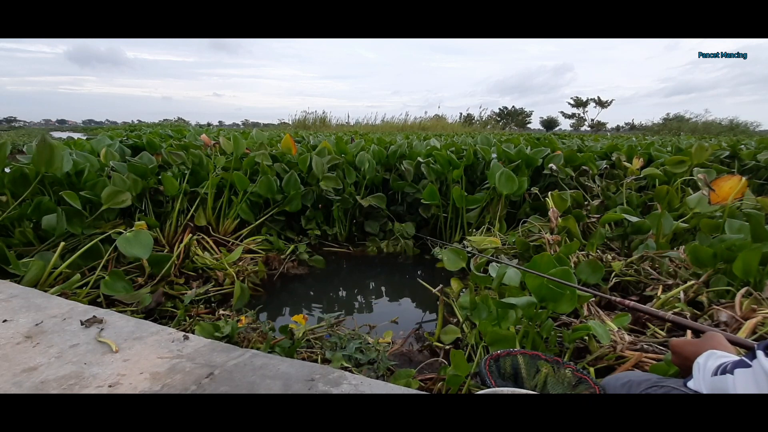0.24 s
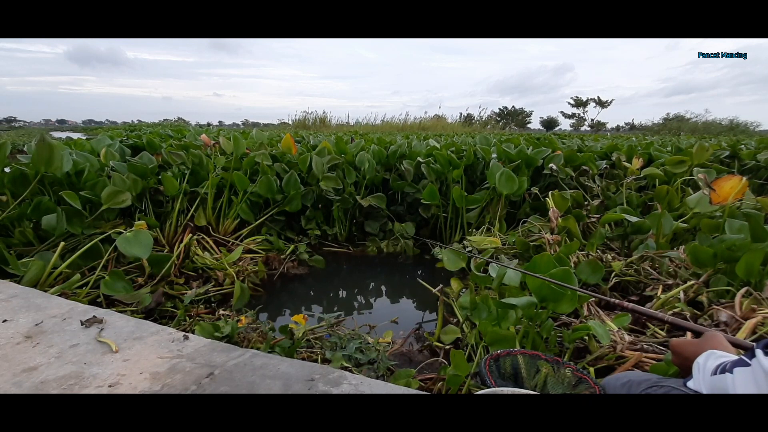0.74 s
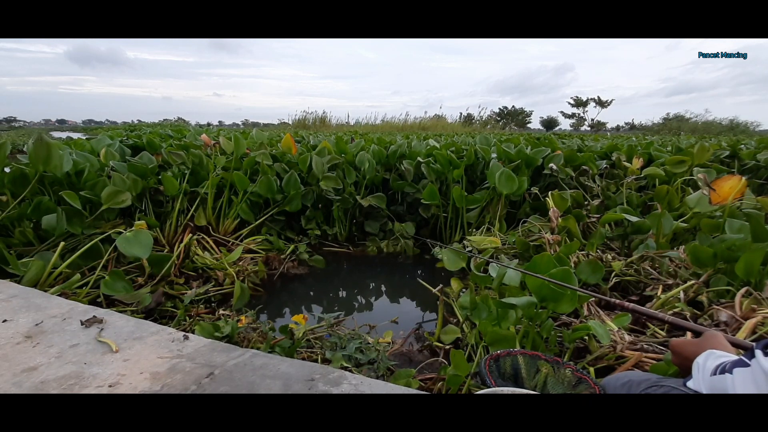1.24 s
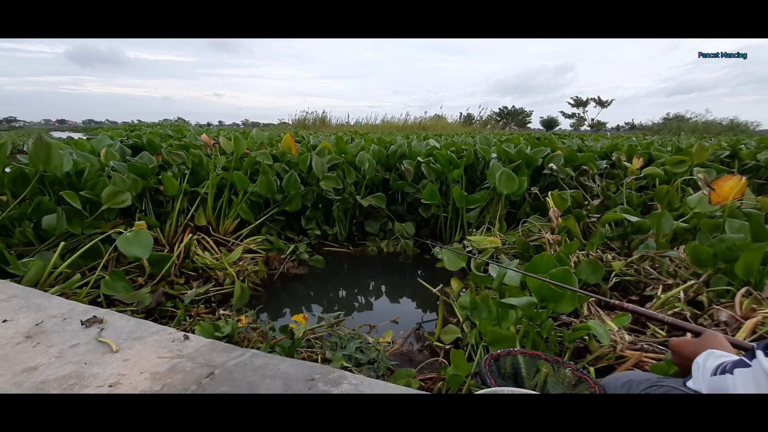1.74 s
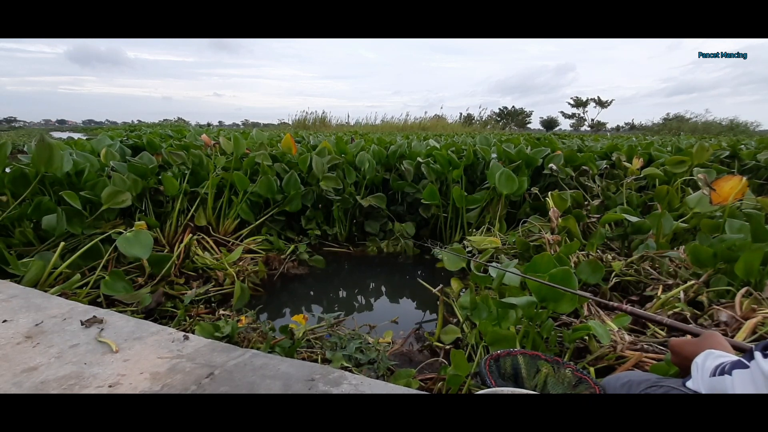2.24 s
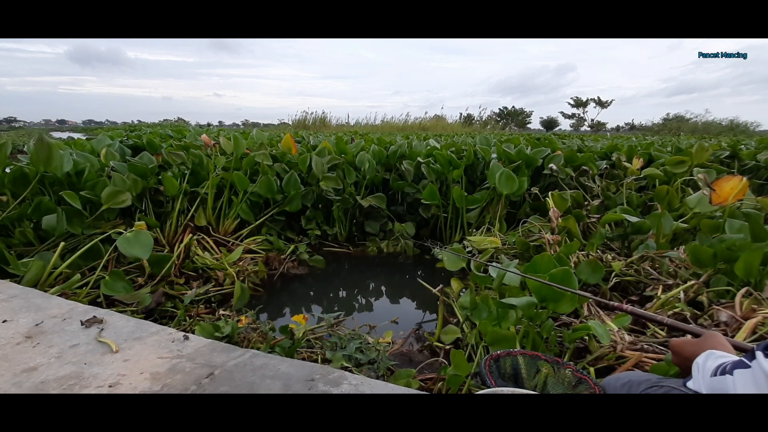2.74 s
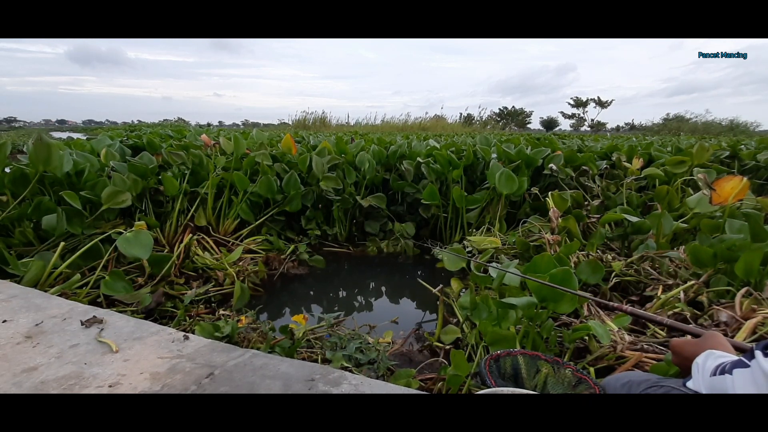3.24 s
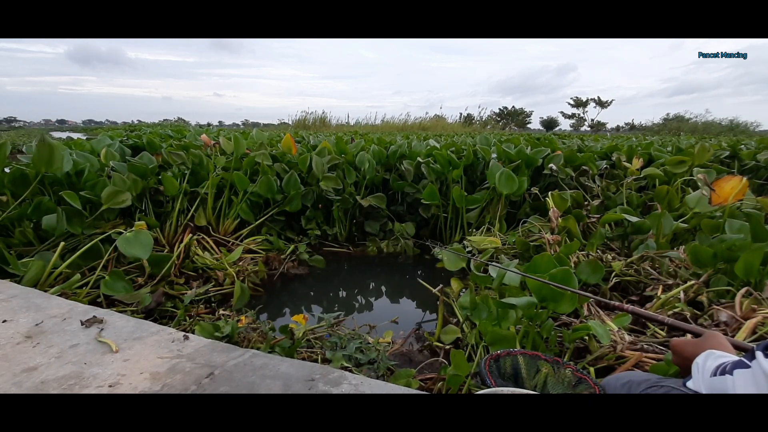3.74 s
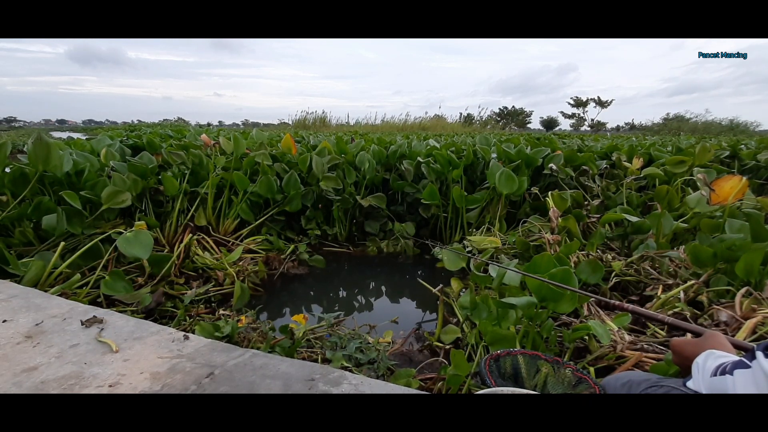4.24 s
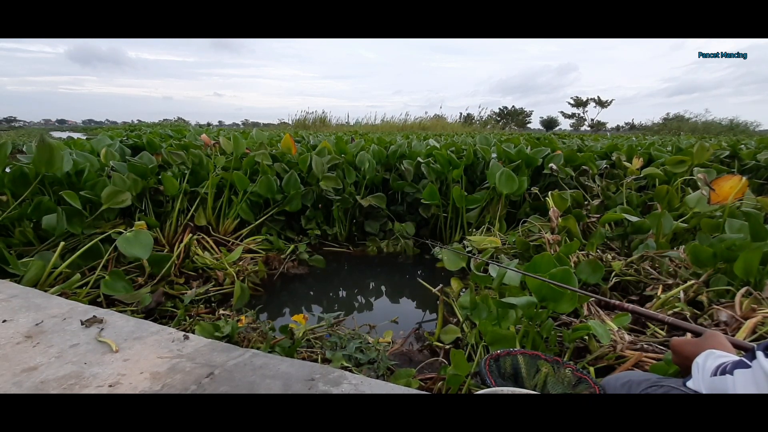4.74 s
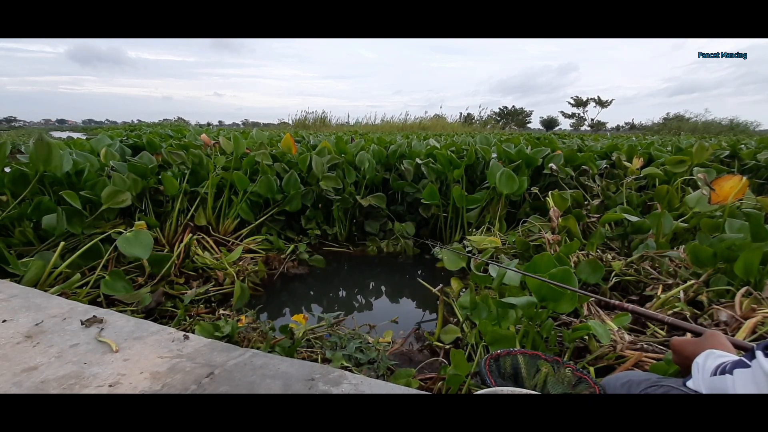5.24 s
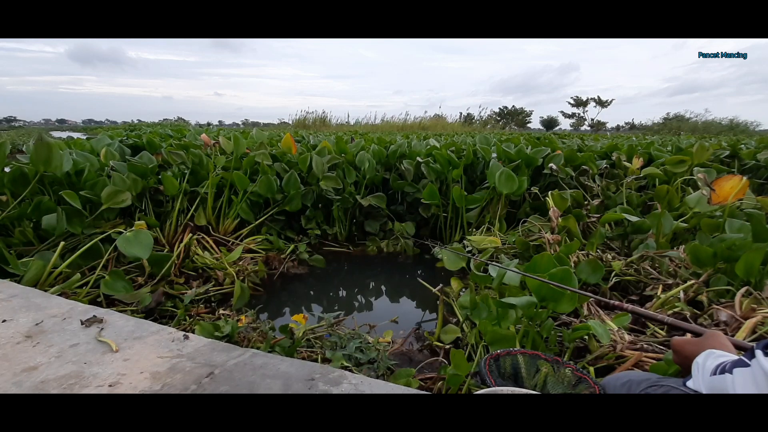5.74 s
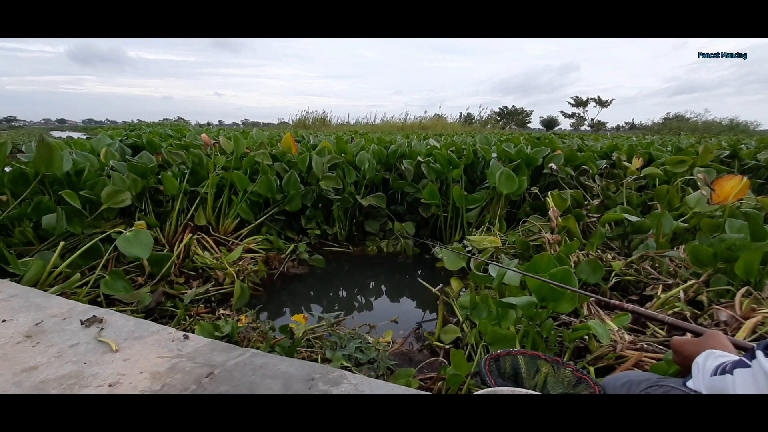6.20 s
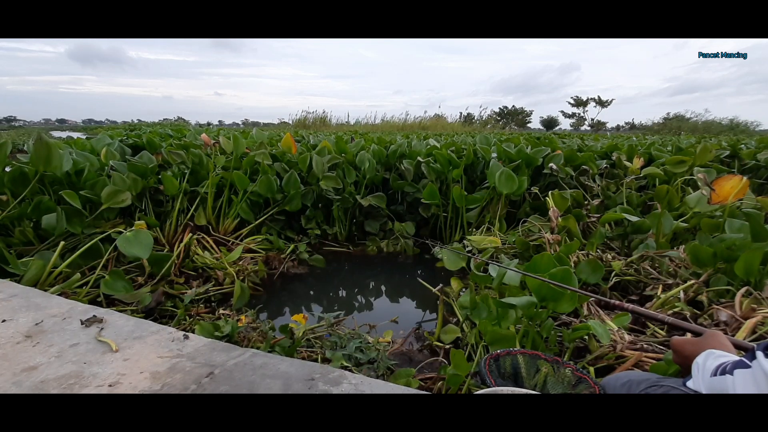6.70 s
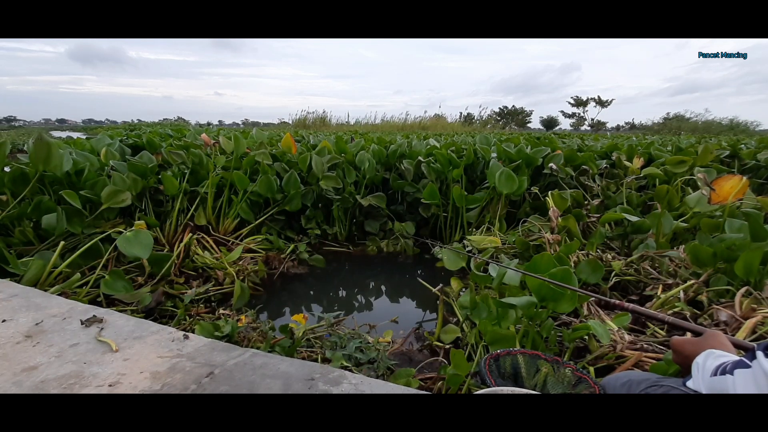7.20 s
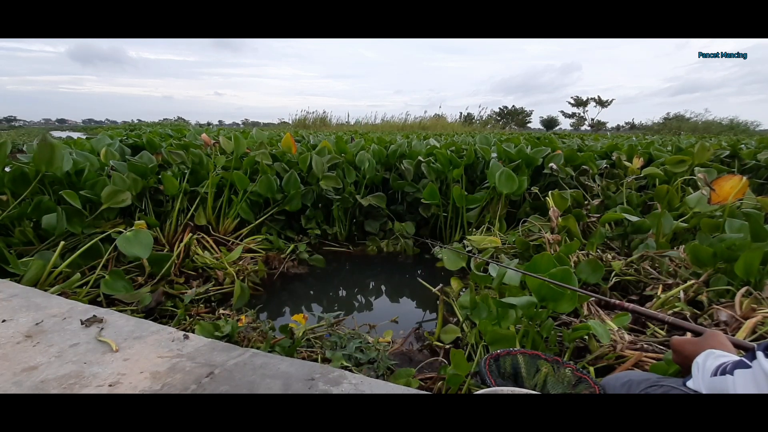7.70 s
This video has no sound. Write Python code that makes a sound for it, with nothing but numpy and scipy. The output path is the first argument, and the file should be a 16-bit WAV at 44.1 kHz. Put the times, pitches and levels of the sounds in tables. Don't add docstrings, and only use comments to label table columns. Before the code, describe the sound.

Outdoors at a plant-choked pond edge, low wind thumps hit a stereo phone's microphones unevenly left and right, heaviest in the first two and a half seconds. Far traffic rumbles and engines hum beneath. A fish plops at 1.4 seconds and again at 6.1, with bubbles and spray toward the right. A thin cicada buzz sits far right; small birds whistle and chatter faintly.

```python
import sys
import numpy as np
from scipy import signal
from scipy.fft import rfft, irfft
from scipy.io import wavfile
from scipy.ndimage import uniform_filter1d

SR = 44100
rng = np.random.default_rng(int(sys.argv[2]) if len(sys.argv) > 2 else 0)


def persist_wave(psi):
    counts = np.round(np.clip(psi, -1, 1) * 32767).astype(np.int16)
    wavfile.write(sys.argv[1], SR, np.atleast_2d(counts).T)


def gain_from_decibels(decibels):
    exponent = np.asarray(decibels, float) / 20
    return 10 ** exponent


N = 351036
T = np.arange(N) / SR
HZ = np.maximum(np.arange(N // 2 + 1) * SR / N, 1)


def unit(x):
    return x / np.sqrt(np.mean(x ** 2))


def noise():
    return rng.standard_normal(N)


def columns(table):
    times, *rest = np.transpose(table)
    return [np.interp(T, times, column) for column in rest]


def window(table, fade_s):
    return np.clip(np.minimum(T - table[0][0], table[-1][0] - T) / fade_s + 0.5, 0, 1)


def walk(rate_hz):
    hold = int(SR / rate_hz)
    held = np.repeat(rng.standard_normal(N // hold + 1), hold)
    return unit(uniform_filter1d(uniform_filter1d(held, hold), hold)[:N])


def colour(x, spectrum):
    hz, db = np.transpose(spectrum)
    return irfft(rfft(x) * gain_from_decibels(np.interp(np.log(HZ), np.log(hz), db, left=-120, right=-120)), N)


def patchy(spectrum, patchy_db, rate_hz):
    whole, out = rfft(colour(noise(), spectrum)), 0
    half_octaves = 2 * np.log2(HZ)
    first = np.floor(2 * np.log2(spectrum[0][0]))
    last = 2 * np.log2(min(spectrum[-1][0], 6000))
    for middle in np.arange(first, last + 1):
        share = np.cos(np.pi / 2 * np.clip(half_octaves - middle, -1, 1)) ** 2
        out = out + irfft(whole * share, N) * gain_from_decibels(patchy_db * walk(rate_hz))
    return unit(out)


def ring(hz, width_hz):
    return 1 / (1 + 1j * (HZ / hz - hz / HZ) * hz / width_hz) ** 2


def resonate(x, response):
    return unit(irfft(rfft(x) * response, N))


def tent(s, db, rise_db_s, fall_db_s):
    return db - np.maximum(rise_db_s * (s - T), fall_db_s * (T - s))


def far(x, pan_db):
    right_lag = 13
    return np.array([x * gain_from_decibels(pan_db / 2), np.roll(x, right_lag) * gain_from_decibels(-pan_db / 2)])


# (frequency [Hz], level [dB per Hz])
EDDY_SPECTRUM = [(20, -36), (40, -9.5), (60, -3.5), (100, 0.5), (140, -6.5), (220, -20), (400, -41),
                 (700, -64.5)]
# (time of peak [s], peak level [dB], left minus right [dB])
GUST_PEAKS = [(0, -13.5, -1), (0.277, -9, 2.5), (.54, -15.5, -3.5), (.84, -20.5, 8), (1.04, -9, 1.5),
              (1.56, -16, 1), (1.74, -12, -9.5), (2.2, -12, -2), (2.72, -30, 4), (3.06, -32, -4),
              (3.84, -27, -4), (4.08, -22.5, 4), (4.619, -16.5, -5.5), (4.86, -22, -3), (5.08, -22, 7),
              (5.46, -22.5, 9), (6.26, -13.5, 7), (6.4, -18.5, -3.5), (6.54, -19, 0), (6.8, -15.5, 1),
              (7.24, -21.5, -9.5), (7.64, -17.5, 6)]


def wind():
    calm_db = -36.5
    power, lean = gain_from_decibels(2 * calm_db), 0
    for s, peak_db, side_db in GUST_PEAKS:
        gust = gain_from_decibels(2 * tent(s, peak_db, rise_db_s=107.5, fall_db_s=122))
        power, lean = power + gust, lean + side_db * gust
    db, pan_db = 10 * np.log10(power), lean / power
    ports = np.array([patchy(EDDY_SPECTRUM, patchy_db=4.0, rate_hz=9) for _ in range(2)])
    bright = [(20, -40.0), (120, -10.5), (300, 4.0), (700, 3.0)]  # Hz, dB
    crests = np.array([colour(port, bright) for port in ports])
    thumps = ports + crests * gain_from_decibels(db + 14.5)
    return thumps * gain_from_decibels(-2.5 + 1.154 * db + 1.76 * np.array([pan_db, -pan_db]) / 2)


# (time [s], level [dB])
TRAFFIC = [(0, -18.5), (.7, -17.5), (1.6, -19.5), (2.3, -20.5), (2.9, -19.5), (3.7, -20), (4.2, -23.5),
           (4.96, -21), (5.9, -20.5), (6.7, -22), (7.96, -21.5)]
# (frequency [Hz], level [dB per Hz])
RUMBLE_SPECTRUM = [(20, -51), (35, -18.5), (55, -5.5), (93, 1), (140, -2), (200, -3.5), (240, -11),
                   (350, -16.5), (480, -22.5), (620, -32), (780, -43.5), (1200, -51.5)]
# (frequency [Hz], level [dB per Hz])
SWISH_SPECTRUM = [(500, 0.5), (680, 1), (790, -7), (870, -3.5), (1000, -6), (1250, -4.5), (1500, -10.5),
                  (1750, -8), (2300, -13.5), (2800, -22), (4000, -36.5), (6000, -43)]
# (time when nearest [s], distance over speed [s], tyre swish there [dB])
PASSING_CARS = [
    (.95, .15, -56.5),
    (1.37, 0.23, -49.5),
    (4.0, 0.32, -63),
    (7.6, 0.14, -58.5),
]
# (frequency [Hz], width [Hz], level [dB])
GEAR_TONES = [(1360, 90, 1), (1738, 180, 2), (2420, 190, -19.5)]


def road():
    rumble_db, = columns(TRAFFIC)
    swish_power = gain_from_decibels(2 * (rumble_db - 40))
    for s, span_s, db in PASSING_CARS:
        swish_power = swish_power + gain_from_decibels(2 * db) / (1 + ((T - s) / span_s) ** 2)
    swish_db = 10 * np.log10(swish_power)
    diffuse_tilt = [(20, -14.0), (130, -14.0), (320, 2.0), (7000, 5.0)]  # Hz, dB
    out = 0
    for spectrum, db, diffuse, patchy_db in ((RUMBLE_SPECTRUM, rumble_db - 2.0, 0.3, 0.8),
                                             (SWISH_SPECTRUM, swish_db + 4.0, 0.7, 2.8)):
        spread = np.array([colour(patchy(spectrum, patchy_db, rate_hz=4), diffuse_tilt) for _ in range(2)])
        direct = far(patchy(spectrum, patchy_db, rate_hz=4), pan_db=-2.0)
        out = out + gain_from_decibels(db) * (direct + diffuse * spread)
    whine = resonate(noise(), sum(gain_from_decibels(db) * ring(hz, width) for hz, width, db in GEAR_TONES))
    whine_db = tent(1.9, -54, rise_db_s=11, fall_db_s=27)
    return out + far(whine * gain_from_decibels(whine_db), pan_db=-11.0)


def engine(track, orders, wobble, waver_db):
    hz, db = columns(track)
    turns = np.cumsum(hz * (1 + wobble * walk(3))) / SR
    lines = 0
    for multiple, line_db in orders:
        tone = np.sin(2 * np.pi * (multiple * turns + rng.random()))
        lines = lines + gain_from_decibels(line_db + waver_db * walk(3.945)) * tone
    return lines * np.sqrt(2) * gain_from_decibels(db) * window(track, fade_s=0.22)


# (time [s], firing rate [Hz], level [dB])
TRUCK_TRACK = [(0, 24.83, -30), (.8, 24.96, -29), (1.3, 24.99, -26.5), (1.9, 25.03, -27), (2.1, 24.32, -32)]
# (multiple of firing rate, level [dB])
TRUCK_LINES = [(2, -14), (3, -12), (4, 1), (5, -9), (6, 1.5), (7, -3), (8, -2), (10, -7.5), (12, -15),
               (14, -9.5)]
# (time [s], firing rate [Hz], level [dB])
PUMP_TRACK = [(2.1, 28.53, -33), (3, 28.48, -30), (4, 28.03, -29), (5, 28.2, -33), (6, 28.59, -25.5),
              (7, 28.56, -22), (7.96, 28.52, -18.5)]
# (multiple of firing rate, level [dB])
PUMP_LINES = [(3, -12), (4, -1.5), (5, -3), (6, -0.5), (7, -10.5), (8, -14), (10, -17), (11, -19.5)]
# (time [s], frequency [Hz], level [dB])
LONE_LINES = [
    [(1.7, 143.7, -26.5), (2.3, 142, -26), (2.7, 134, -23), (3.1, 123, -24.5), (3.6, 117.2, -29),
     (4.1, 112.8, -25)],
    [(4.6, 342, -46.5), (5.3, 345, -39.5), (6.1, 338, -45)],
    [(2.4, 314.4, -42.5), (3.9, 311, -48.5), (5.9, 309.9, -43.5)],
    [(6.8, 143.3, -13.5), (7.2, 139, -29), (7.6, 132.8, -26.5), (7.96, 127.2, -24)],
    [(6.1, 112.3, -23), (6.7, 110, -28.5), (7.3, 103, -26.5), (7.96, 100, -34.5)],
    [(7.45, 232, -32.5), (7.6, 230, -27.5), (7.96, 228, -30)],
    [(6.4, 258, -39.5), (6.55, 256, -32), (6.8, 255, -33.5)],
]


def engines():
    truck = engine(TRUCK_TRACK, TRUCK_LINES, wobble=0.0039, waver_db=1.47)
    pump = engine(PUMP_TRACK, PUMP_LINES, wobble=0.0049, waver_db=2.5)
    lone = sum(engine(track, [(0.98, 0.24)], wobble=0.00661, waver_db=1.5) for track in LONE_LINES)
    return far(gain_from_decibels(-2.0) * truck + gain_from_decibels(-1.0) * pump + lone, pan_db=-1.2)


# (time [s], peak level [dB], pitch [Hz], t60 [s], glide [share of pitch])
BUBBLE_PINGS = [(0.118, -35.5, 900, .077, 0.05), (1.239, -34.5, 1290, .03, -0.12),
                (1.241, -32, 850, .025, -0.0062), (1.272, -27.5, 1080, 0.057, -0.066),
                (1.282, -44, 3000, .029, 0.08), (1.3, -42, 1297, .11, 0.11), (1.397, -33, 1450, .02, -.1),
                (1.399, -34, 1150, .045, -0.26), (1.412, -17, 845, 0.037, 0.032),
                (1.415, -18.5, 675, 0.066, 0.042), (1.412, -30, 1250, .03, 0.023),
                (1.412, -39, 2800, .04, -0.085), (1.414, -32, 1530, 0.035, -0.044),
                (1.413, -30, 2100, .025, .05), (1.413, -35, 1780, .025, .05),
                (1.422, -36, 2300, 0.054, .02), (1.433, -33, 1255, 0.038, -.03),
                (1.432, -44, 1540, 0.026, -0.075), (1.437, -38, 2150, .03, .03),
                (1.447, -45, 2150, .03, .03), (1.473, -37.5, 2080, .025, -.15),
                (1.476, -40, 1180, .05, .03), (6.053, -36, 634, 0.071, 0.93),
                (6.06, -27, 1710, 0.016, -0.17), (6.066, -22.5, 1465, .022, -0.23),
                (6.058, -32, 900, .02, 0.1), (6.051, -52, 2600, 0.045, 0.11),
                (6.068, -49, 2580, 0.089, .02), (6.076, -41, 1600, .04, 0.011),
                (6.092, -26, 1550, 0.011, -.2), (6.093, -15, 1150, 0.01, -0.33),
                (6.094, -22, 532, 0.039, -0.12), (6.094, -43, 3300, .03, .03),
                (6.102, -29.5, 600, 0.052, 0.74), (6.109, -51, 2620, .08, 0.11),
                (6.118, -27, 1040, .035, -0.14), (6.066, -47, 4250, .03, .02),
                (6.165, -35, 1190, 0.041, -0.02), (6.274, -44, 1570, .04, 0.077),
                (6.242, -40, 1070, .02, 0.12), (6.256, -40, 1450, 0.065, .1), (6.271, -46, 2600, .05, -.01),
                (6.285, -51.5, 2600, 0.17, .01), (6.31, -51, 1160, .067, .05)]
# (time [s], level [dB], t60 [s], treble level [dB])
SPRAY_BURSTS = [(.783, -58, .025, 16), (.783, -58, .025, 16), (1.206, -51.5, 0.12, 1),
                (1.237, -45.5, .1, -6.5), (1.275, -45.5, .12, -4), (1.36, -56.5, .3, 6),
                (1.395, -52, .2, 2.5), (1.384, -58, .04, 16), (1.408, -47.5, 0.025, 22.5),
                (1.411, -35.5, 0.12, -8.5), (1.422, -40, 0.11, -6.5), (1.434, -41.5, 0.11, 2),
                (1.474, -44.5, .06, 3), (1.49, -50, .35, -3), (1.49, -50, .35, -3), (6.035, -57, 0.17, 10),
                (6.06, -39.5, 0.22, -9), (6.072, -37, 0.11, -15), (6.092, -36.5, .015, -8),
                (6.093, -35.5, 0.077, -20), (6.11, -42, 0.39, -17.5), (6.17, -50.5, 0.45, -6),
                (6.2, -50.5, .3, -8), (6.253, -50.5, .03, 13), (6.256, -44.5, 0.33, -8.5)]
# (frequency [Hz], level [dB per Hz])
SPRAY_BODY = [(450, -4.5), (900, -1), (1600, -8.5), (2600, -11), (3300, -18), (5500, -28.5)]
# (frequency [Hz], level [dB per Hz])
SPRAY_TREBLE = [(3000, -13), (5000, -7.5), (9500, -9.5), (12500, -2), (16000, -14)]


def splashes():
    out, t = np.zeros((2, N)), np.arange(SR // 4) / SR
    waver = gain_from_decibels(2.0 * walk(200))

    def decay(t60):
        return np.exp(-np.log(1000) * t / t60) * np.minimum(t / 0.0016, 1)

    for s, db, hz, t60, glide in BUBBLE_PINGS:
        part = slice(int(s * SR), int(s * SR) + len(t))
        pitch = hz * (1 + glide * np.minimum(3 * t / t60, 1))
        ping = np.sin(2 * np.pi * np.cumsum(pitch) / SR) * waver[part] * decay(t60)
        out[:, part] += gain_from_decibels(db - 0.5 + np.array([[-10.5], [10.5]]) / 2) * ping
    low = np.array([unit(colour(noise(), SPRAY_BODY)) for _ in range(2)])
    high = np.array([unit(colour(noise(), SPRAY_TREBLE)) for _ in range(2)])
    for s, db, t60, treble_db in SPRAY_BURSTS:
        part = slice(int(s * SR), int(s * SR) + len(t))
        hiss = low[:, part] * gain_from_decibels([[-5.0], [0]]) + high[:, part] * gain_from_decibels(treble_db + np.array([[-24.0], [-9.0]]))
        out[:, part] += gain_from_decibels(db) * hiss * decay(t60)
    return out


# (frequency [Hz], width [Hz], level [dB])
TYMBAL_MODES = [(7110, 480, 6), (7310, 500, -7.5)]
# (time [s], level [dB])
CICADA_LEVEL = [(0, -53.5), (2.5, -55.5), (4.2, -53.5), (5.9, -55), (7, -52), (7.96, -52.5)]
# (time of middle throb [s], length [s], depth [dB])
THROB_BOUTS = [
    (0.963, 1.8, 3.5),
    (2.128, 0.64, 2.5),
    (3.205, 2, 3),
    (4.877, 0.35, 4),
    (6.335, 1.5, 4.5),
    (7.479, .9, 3),
]


def insects():
    throb_hz, throb_db = 6.55, 0
    for s, length, depth_db in THROB_BOUTS:
        bout = np.cos(np.pi * np.clip((T - s) / length, -0.5, 0.5))
        throb_db = throb_db + depth_db * bout * np.cos(2 * np.pi * throb_hz * (T - s))
    clicks = noise() * ((rng.random(N) < 1500 / SR) + 0.43) * gain_from_decibels(1.1 * walk(115))
    cicada = resonate(clicks, sum(gain_from_decibels(db) * ring(hz, width) for hz, width, db in TYMBAL_MODES))
    skirt = resonate(noise(), ring(7900, 1600))
    cricket = resonate(noise(), ring(8100, 800))
    stop_s = 6.22
    swell = np.clip(1 + (T - stop_s) / 1.9, 0, 1) * np.clip((stop_s - T) / 0.026, 0, 1)
    out = cicada * gain_from_decibels(columns(CICADA_LEVEL)[0] + 6.0 + throb_db)
    out = out + skirt * gain_from_decibels(-61.5) + cricket * (gain_from_decibels(-55.5) * swell + gain_from_decibels(-74))
    return out * gain_from_decibels([[-44], [0]])


def add(out, s, length, db, hz):
    start = int(s * SR)
    t = np.linspace(0, 1, int(length * SR))[:N - start]
    tone = np.sin(2 * np.pi * np.cumsum(hz(t)) / SR)
    out[start:start + len(t)] += tone * np.sin(np.pi * t) ** 0.35 * gain_from_decibels(db + 4.0)


def arch(length, top, sag_hz):
    peak, rise_hz_s, fall_hz_s = 0.25, 8000, 4000
    def pitch(t):
        bend = np.where(t < peak, rise_hz_s / peak, fall_hz_s / (1 - peak))
        return top - sag_hz * t ** 2 - length * bend * (t - peak) ** 2
    return pitch


def strokes(db, hz, span, rate_hz):
    out, t = np.zeros(N), np.linspace(0, 1, SR // 55)
    starts = np.cumsum(rng.uniform(0.4, 1.7, int(N / SR * rate_hz)) * SR / rate_hz).astype(int)
    starts = starts[starts < N - len(t)]
    for i, (offset, turn, loud) in zip(starts, rng.standard_normal((len(starts), 3))):
        sweep = span * np.sign(turn - 0.9) * (2 * t - 1)
        pitch = hz[i] * (1 + 0.7 * span * np.tanh(offset) + sweep)
        tone = np.sin(2 * np.pi * np.cumsum(pitch) / SR) * np.sin(np.pi * t)
        out[i:i + len(t)] += tone * gain_from_decibels(db[i] + 4.1 * np.tanh(loud))
    return out


# (time [s], length [s], top pitch [Hz], level [dB], extra sag [Hz])
NEAR_WHISTLES = [
    (0.683, 0.03, 4000, -51.5, 4),
    (2.358, .04, 4000, -58.5, -80),
    (2.405, .06, 3980, -63, -120),
    (2.713, 0.11, 4130, -54.5, 100),
    (2.928, .095, 4550, -63, -150),
    (3.63, 0.016, 4050, -64.5, 147),
    (3.732, 0.02, 4020, -68, 5),
    (3.968, 0.021, 4060, -52, -80),
    (5.756, .118, 4190, -59.5, 121),
    (7.185, 0.011, 4096, -63.5, 3.5),
]
# (time [s], length [s], top pitch [Hz], level [dB], extra sag [Hz])
DISTANT_WHISTLES = [(0.063, 0.11, 3980, -70.5, 200), (.075, 0.034, 4520, -74, 251),
                    (.16, .11, 4640, -73, -100), (.345, .025, 4000, -75, 149), (.39, 0.025, 4900, -68, 350),
                    (.42, .03, 4600, -71, 5), (0.405, 0.07, 3870, -64, -350),
                    (.455, 0.033, 4350, -75, -150), (.722, .07, 4060, -66, -60),
                    (2.153, 0.025, 6160, -66, 100), (2.805, 0.052, 4170, -68, 7),
                    (2.85, .035, 4520, -67, 250), (3.025, 0.041, 4550, -74, 352),
                    (4.066, 0.026, 4040, -71, 5), (4.567, 0.028, 5850, -68, 200),
                    (5.642, .02, 4080, -72, 5), (5.662, 0.035, 4060, -69, -60),
                    (5.705, .025, 4130, -71.5, 5), (5.805, .06, 4620, -75, -80),
                    (7.829, 0.042, 4470, -67, -51), (7.922, .035, 4580, -63.5, 3)]
# (time [s], start pitch [Hz], end pitch [Hz], level [dB])
SONG_CHIRPS = [(.522, 4320, 3950, -63.5), (.597, 4070, 3500, -64), (.713, 4220, 3700, -54),
               (.738, 3700, 2900, -60.5), (.756, 3300, 2800, -64), (.79, 4200, 3700, -67),
               (0.789, 3160, 2750, -59), (.826, 3900, 3410, -63), (.834, 2830, 3700, -60),
               (.857, 3700, 2810, -57.5), (.855, 4800, 4200, -65), (.895, 4600, 4700, -67),
               (.925, 3300, 2900, -68), (2.025, 4050, 3920, -69), (2.628, 3680, 4050, -66),
               (2.639, 4050, 3700, -66), (2.068, 4030, 3880, -71), (2.178, 4100, 3900, -69),
               (2.205, 4000, 4250, -69.5), (2.275, 4150, 3570, -65.5), (2.295, 3970, 3370, -66),
               (2.32, 3620, 3300, -69), (2.338, 3640, 3100, -69), (2.393, 4180, 3480, -59),
               (2.413, 3800, 3200, -60), (2.535, 4700, 4900, -68), (2.462, 3930, 2850, -60),
               (2.503, 3190, 3790, -65), (2.513, 4000, 3410, -59), (2.535, 3690, 3000, -61),
               (3.757, 4050, 3750, -63), (3.806, 4320, 3950, -65), (3.825, 4200, 3800, -65),
              (3.85, 3580, 4000, -65), (3.878, 4240, 3460, -63), (3.905, 3790, 3350, -65),
              (3.935, 4150, 3390, -66), (3.948, 3410, 2850, -65), (3.999, 4280, 3320, -49.5),
              (4.024, 3870, 3230, -54), (4.045, 3100, 2750, -66), (4.072, 2730, 3340, -58),
              (4.085, 3370, 2690, -68), (4.115, 3480, 3940, -53), (4.128, 2800, 3500, -61),
              (4.147, 3710, 2750, -53.5), (5.686, 3920, 3150, -64), (5.742, 3340, 2750, -66),
              (5.783, 2900, 3230, -74), (5.81, 3350, 2820, -68.5), (5.83, 3510, 3100, -71),
              (7.209, 4250, 3590, -60.5), (7.231, 3940, 3000, -61), (7.286, 3520, 2840, -55),
              (7.331, 2990, 3810, -50.5), (7.354, 3790, 2850, -48.5)]
# (time [s], length [s], level [dB], first pitch [Hz], last pitch [Hz])
CHATTER_BURSTS = [
    (0.493, 0.18, -66.5, 3700, 3570),
    (.74, .2, -62, 3300, 3200),
    (2.051, 0.32, -75, 4000, 3625),
    (2.395, 0.2, -61.5, 3600, 3490),
    (3.8, .16, -63.5, 4130, 3390),
    (4.016, 0.16, -58.5, 3370, 3300),
    (5.66, 0.2, -62.5, 3600, 3100),
    (7.207, .06, -63.5, 4000, 3400),
    (7.264, 0.13, -58.5, 3280, 3240),
]
# (time [s], length [s], middle pitch [Hz], level [dB])
FAR_TWITTER = [(0.836, 0.097, 4200, -67.5), (1.036, 0.051, 4200, -67.5), (1.173, 0.1, 4570, -66),
               (1.545, 0.027, 4630, -69), (1.758, 0.071, 4630, -74), (2.06, 0.073, 4600, -74),
               (2.518, 0.033, 4300, -68.5), (3.142, .08, 4620, -73), (3.325, 0.12, 5280, -71),
               (3.66, 0.051, 4600, -71), (4.35, .12, 5700, -75), (4.52, 0.15, 5970, -73),
               (5.018, 0.082, 4640, -75), (5.31, .08, 4650, -73), (7.495, 0.053, 5870, -71)]


def birds():
    whistles, faint, blurred = np.zeros(N), np.zeros(N), np.zeros(N)
    for s, length, top, db, sag_hz in NEAR_WHISTLES:
        add(whistles, s, length, db, arch(length, top, sag_hz))
    for s, length, top, db, sag_hz in DISTANT_WHISTLES:
        add(faint, s, length, db - 3.5, arch(length, top, sag_hz))
        add(blurred, s, length, db - 19, arch(length, top, sag_hz))
    flutter = gain_from_decibels(1.8 * walk(90))
    near = whistles * flutter ** 1.2 + faint * (flutter ** 2.8 + flutter ** 2.2)
    for s, start, end, db in SONG_CHIRPS:
        add(near, s, 0.015, db, lambda t: start + (end - start) * t)
    for s, length, db, first, last in CHATTER_BURSTS:
        burst = [(s, db, first), (s + length / 2, db, (first + last) / 2), (s + length, db - 2.5, last)]
        chatter = strokes(*columns(burst), span=0.13, rate_hz=42) * window(burst, fade_s=0.02)
        near += chatter * gain_from_decibels(-14.0)
        blurred += chatter * gain_from_decibels(-5.5)
    for s, length, hz, db in FAR_TWITTER:
        twitter = strokes(np.full(N, db - 6.5), np.full(N, hz), span=0.15, rate_hz=180)
        blurred += twitter * window([[s], [s + length]], fade_s=0.03)
    tail = np.arange(SR // 4) / SR
    echoes = rng.standard_normal((2, len(tail))) * np.exp(-tail / 0.044) * gain_from_decibels(-26.0)
    into_reeds = near[None] * gain_from_decibels(-4.5) + gain_from_decibels(13.5) * blurred * gain_from_decibels([[-10], [0]])
    reeds = signal.fftconvolve(into_reeds, echoes, axes=1)[:, :N]
    return far(near, pan_db=-12.5) + reeds * gain_from_decibels([[-4.0], [0]])


def scene():
    return wind() + road() + engines() + splashes() + insects() + birds()


# (frequency [Hz], left level [dB per Hz], right level [dB per Hz])
MICROPHONE_HISS = [(1470, 2.5, -3), (3000, 1.5, 1.5), (4930, -7, -1), (8000, -16, -7), (10600, -4, -9.5),
                   (11700, -5, -3.5), (16000, -1.5, -5.5)]


def microphone_hiss():
    hz, *sides = np.transpose(MICROPHONE_HISS)
    return np.array([colour(noise(), np.transpose([hz, db])) for db in sides]) * gain_from_decibels(-56)


def gate(x, low_hz, floor_db):
    hz, _, cells = signal.stft(x, SR, nperseg=1024)
    rows = len(hz) // 6 * 6
    bands = cells[:, :rows].reshape(2, -1, 6, cells.shape[2])
    power = np.mean(np.abs(bands) ** 2, axis=2)
    power = power * gain_from_decibels(9.0 * uniform_filter1d(rng.standard_normal(power.shape), size=3))
    faint = np.repeat(power < gain_from_decibels(2 * floor_db), 6, axis=1) & (hz[:rows, None] > low_hz)
    cells[:, :rows] *= 1 - faint
    return signal.istft(cells, SR)[1][:, :N]


def low_pass(x):
    return signal.sosfilt(signal.butter(12, 15390, fs=SR, output="sos"), x)


def record(dry):
    clipped = np.clip(dry + microphone_hiss(), -0.97, 0.97)
    ends = np.clip(np.minimum(5 * T, T[-1] - T) / 0.002, 0, 1)
    sound = gate(clipped * ends, low_hz=4200, floor_db=-95)
    return low_pass(sound)


dry = scene()
out = record(dry)
persist_wave(out)
```